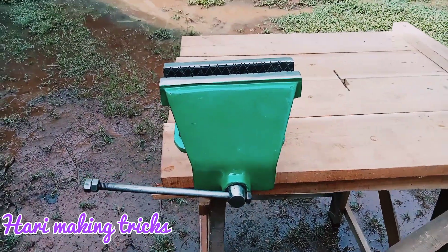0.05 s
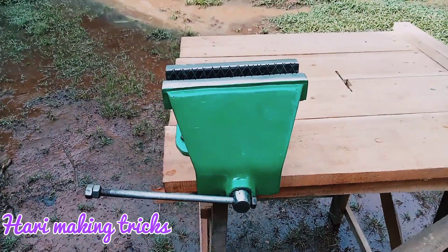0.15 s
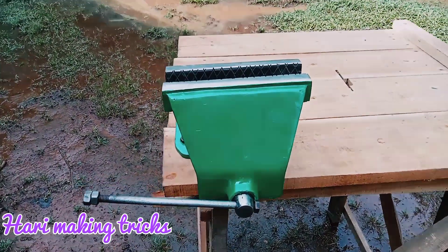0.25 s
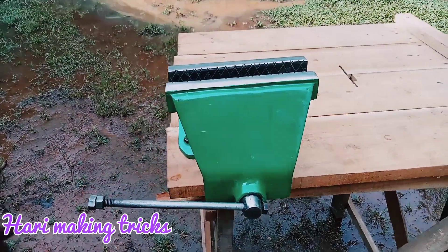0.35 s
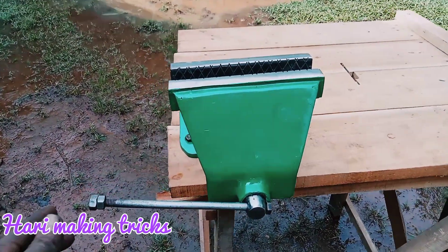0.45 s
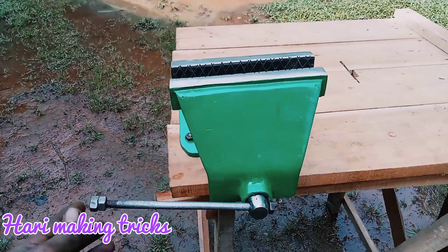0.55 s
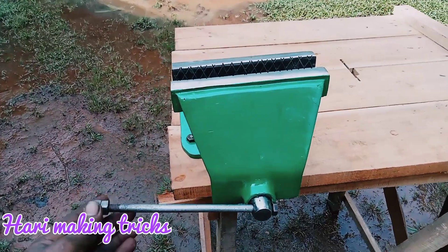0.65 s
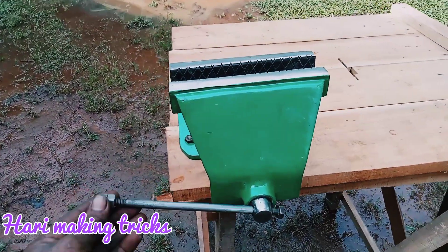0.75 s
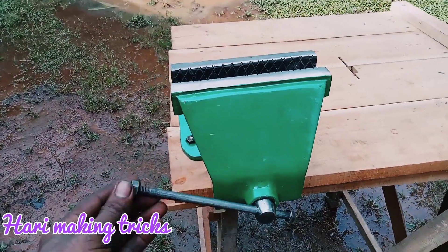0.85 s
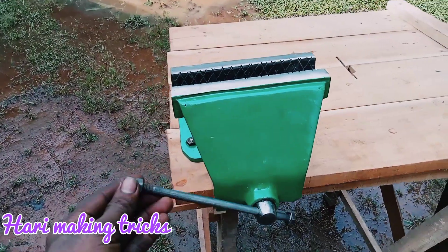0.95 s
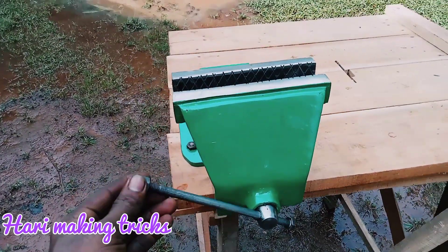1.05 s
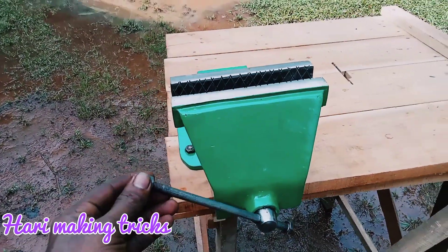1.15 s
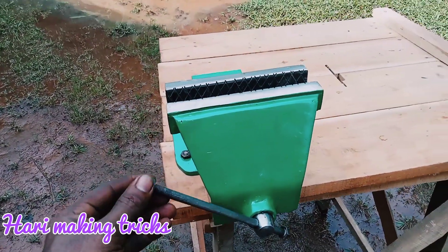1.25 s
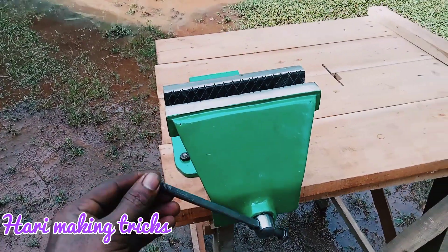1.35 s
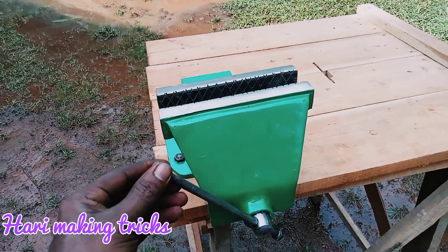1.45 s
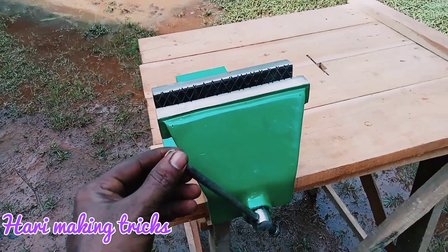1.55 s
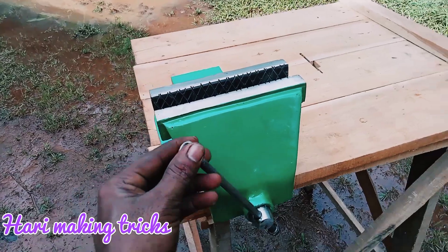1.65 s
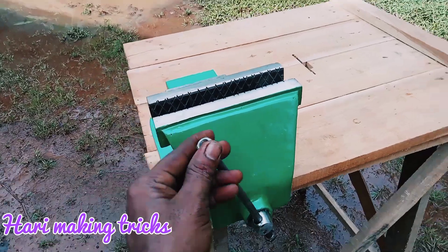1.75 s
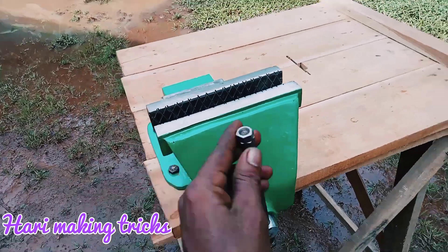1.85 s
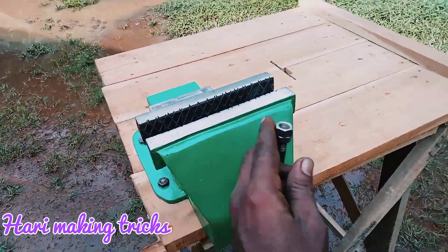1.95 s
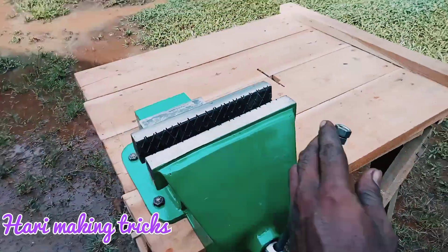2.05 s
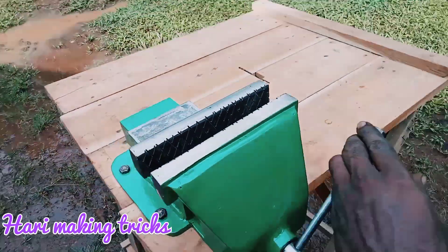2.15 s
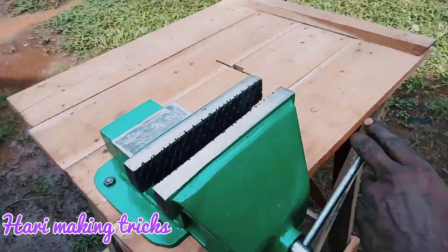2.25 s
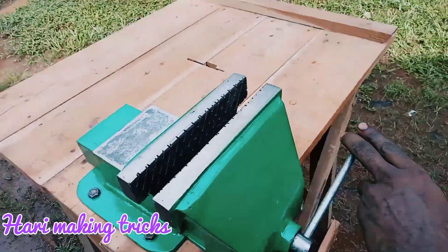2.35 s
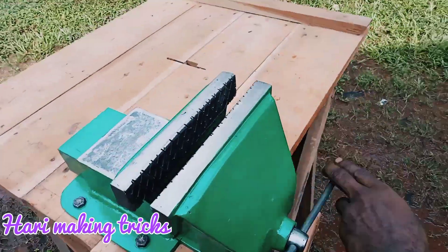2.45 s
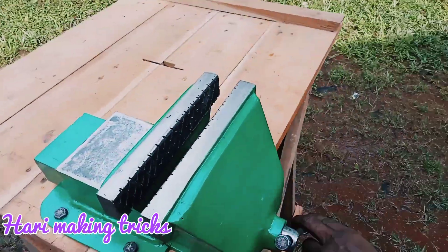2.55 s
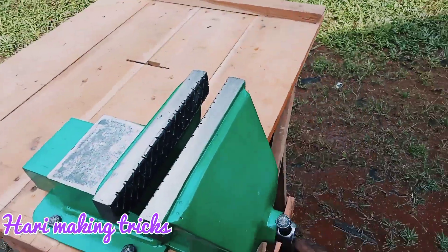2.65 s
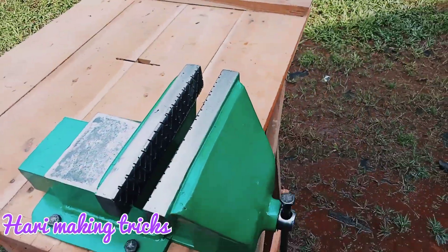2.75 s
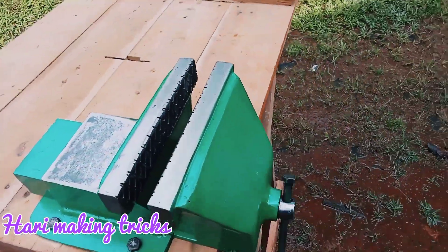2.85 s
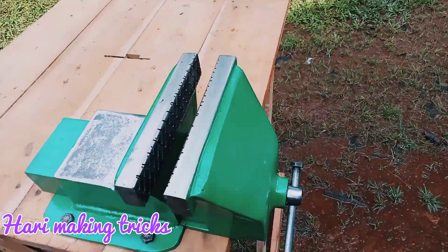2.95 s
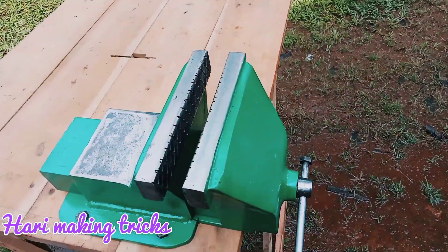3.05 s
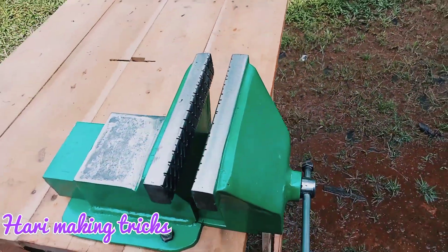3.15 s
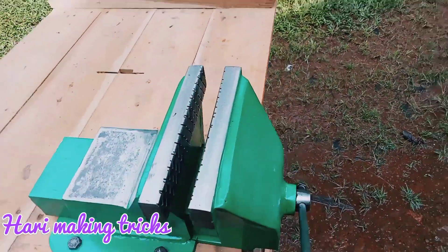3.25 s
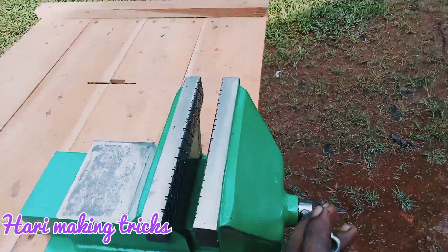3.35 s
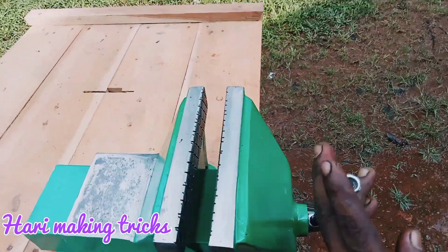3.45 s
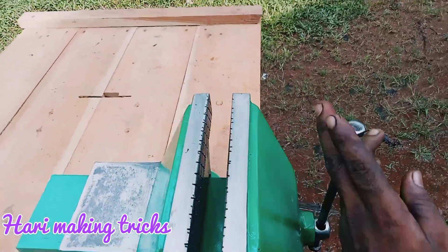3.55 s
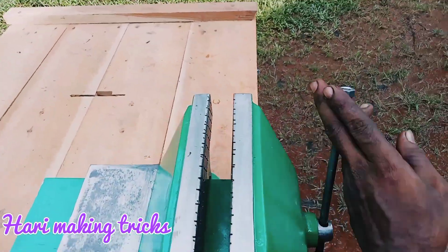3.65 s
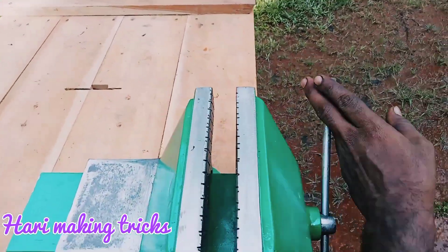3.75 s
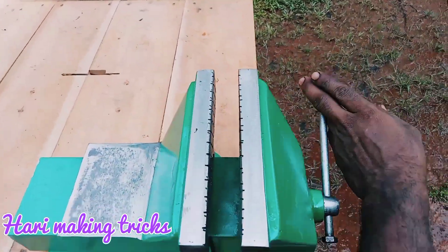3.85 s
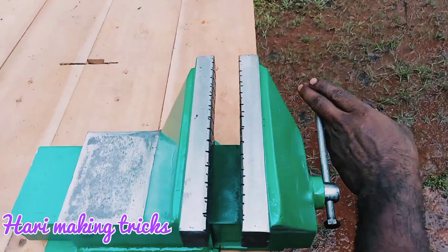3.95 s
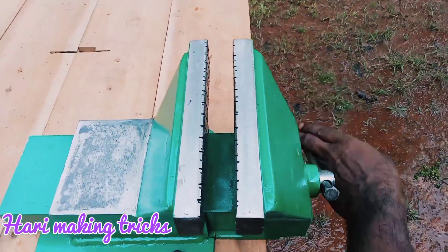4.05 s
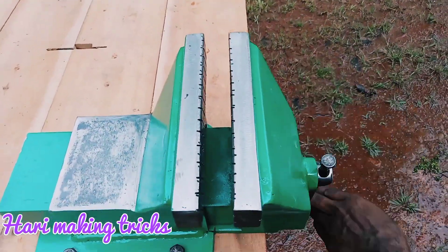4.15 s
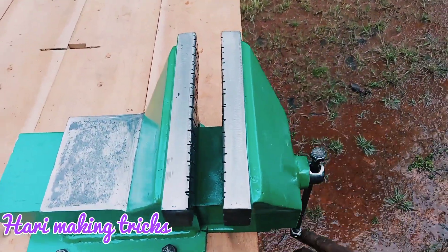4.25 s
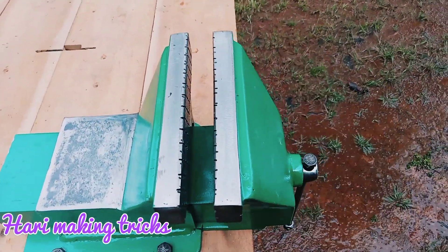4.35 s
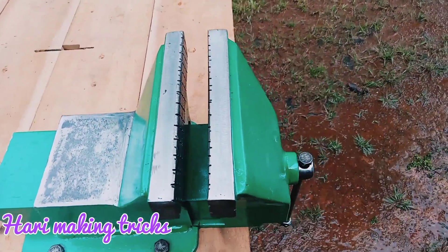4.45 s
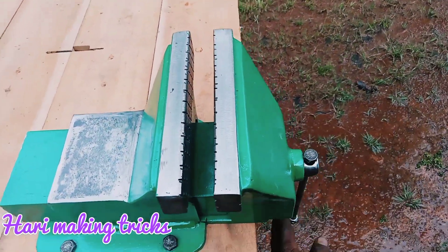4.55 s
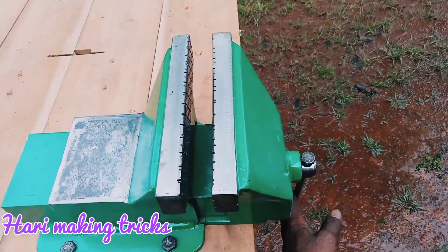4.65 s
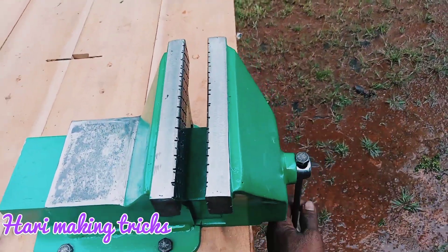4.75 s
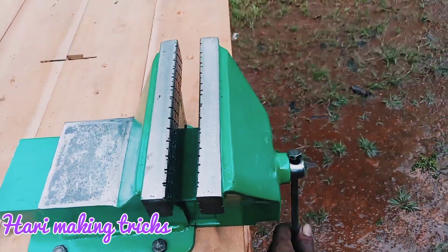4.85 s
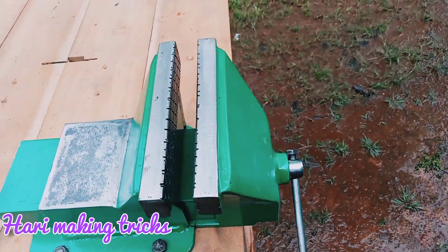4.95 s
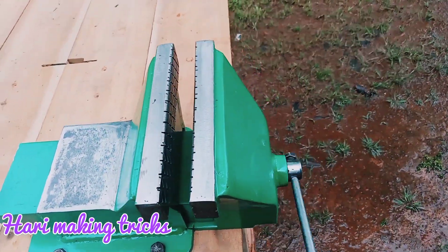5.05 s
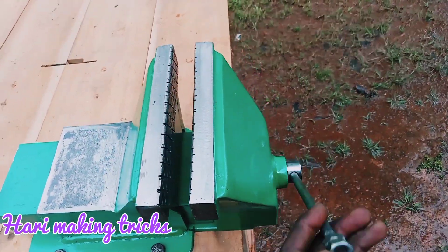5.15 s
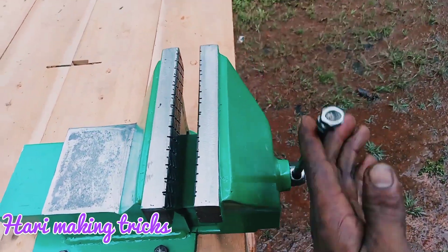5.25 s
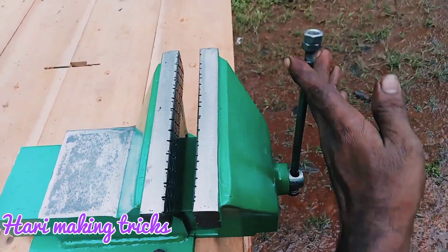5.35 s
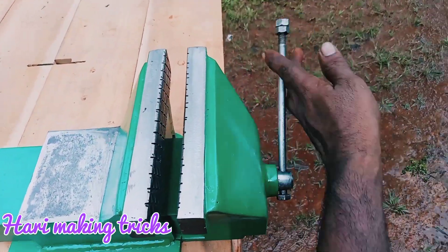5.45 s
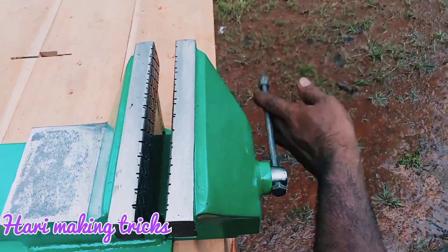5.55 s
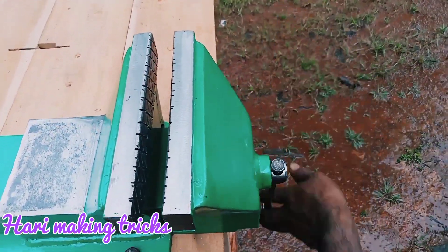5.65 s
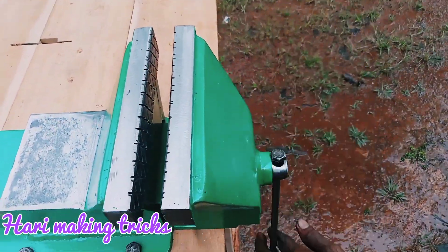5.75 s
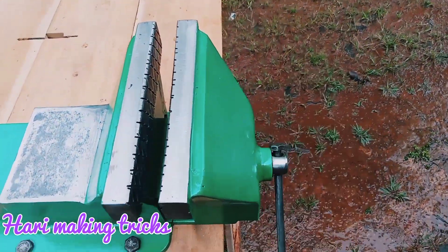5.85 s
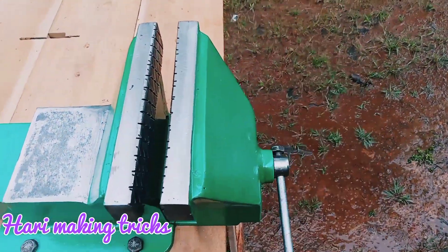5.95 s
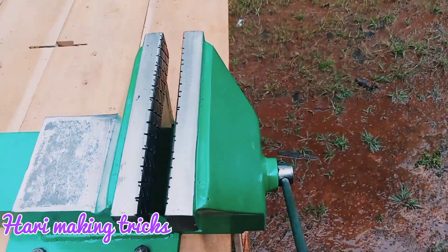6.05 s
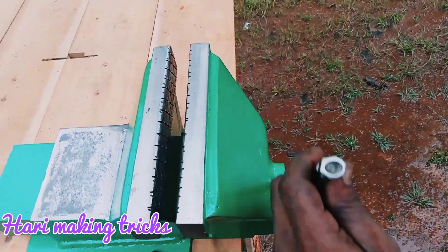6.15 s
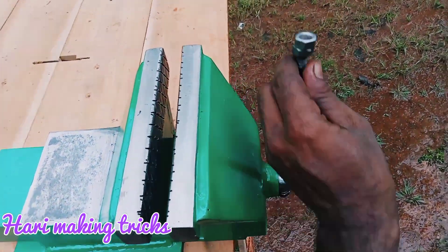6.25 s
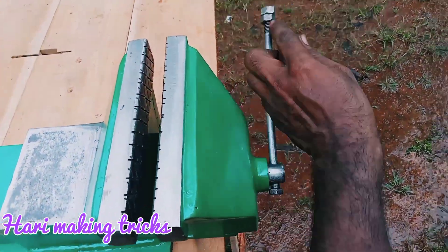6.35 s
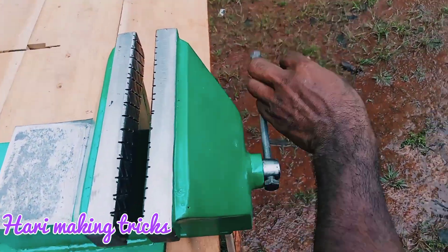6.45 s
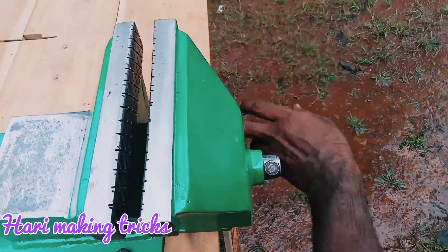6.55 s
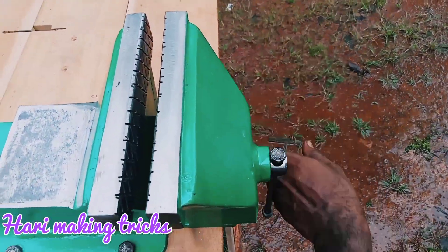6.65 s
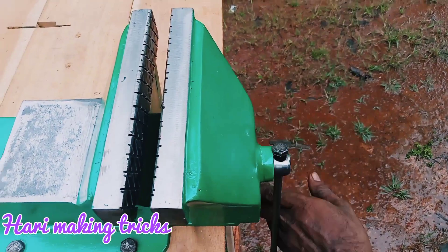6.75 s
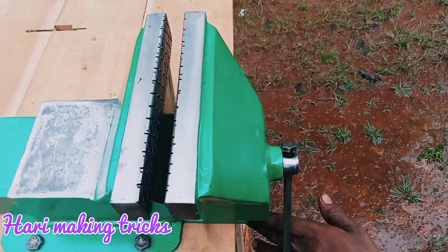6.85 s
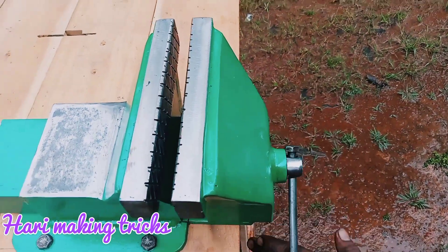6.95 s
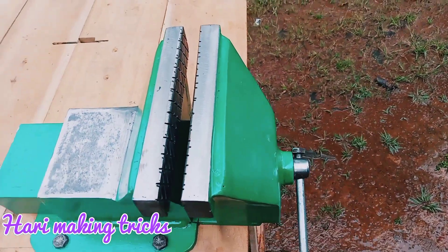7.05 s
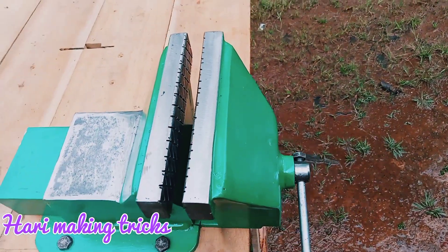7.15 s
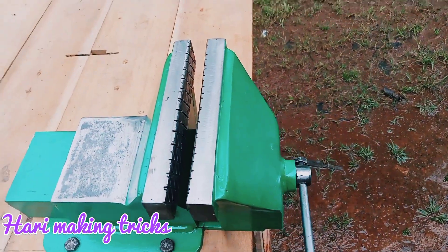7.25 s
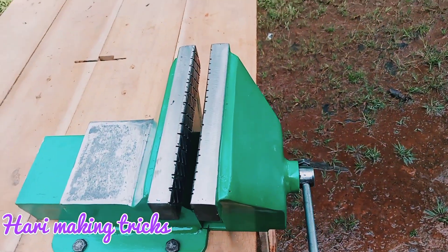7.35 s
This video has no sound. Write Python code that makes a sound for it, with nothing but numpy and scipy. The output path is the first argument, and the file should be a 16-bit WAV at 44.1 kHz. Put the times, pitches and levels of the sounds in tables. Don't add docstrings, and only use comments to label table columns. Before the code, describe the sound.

Close handheld phone capture in an open garden: a metal vise is wound open and shut. Dry screw grinding and small clicks build to two loud steel clacks, followed by irregular clunks and rattles with woody thuds from the bench. Quiet insect hiss, a thin high cricket and hoarse paired bird chirps remain behind. The treble is muffled for the first second; there is little reverberation.

```python
import sys
import numpy as np
from scipy import signal
from scipy.fft import rfft, irfft, next_fast_len
from scipy.io import wavfile
from scipy.ndimage import uniform_filter1d

SR = 44100
rng = np.random.default_rng(int(sys.argv[2]) if len(sys.argv) > 2 else 0)


def bounce(signal):
    frames = np.transpose(np.atleast_2d(signal))
    limited = np.clip(frames, -1, 1)
    pcm = np.round(limited * 32767).astype(np.int16)
    wavfile.write(sys.argv[1], SR, pcm)


def field_ratio(decibels):
    return 10 ** (np.asarray(decibels, dtype=float) / 20)


N = 325899
T = np.arange(N) / SR


def unit(x):
    return x / np.sqrt(np.mean(x ** 2))


def peak(x):
    return x / np.max(np.abs(x))


def colour(x, table):
    hz, db = np.transpose(table)
    size = next_fast_len(len(x))
    f = np.maximum(np.arange(size // 2 + 1) * SR / size, 1)
    gain = field_ratio(np.interp(np.log(f), np.log(hz), db))
    return irfft(rfft(x, size) * gain, size)[:len(x)]


def band(x, lo_hz, hi_hz):
    sos = signal.butter(3, [lo_hz, min(hi_hz, SR / 2.2)], "bandpass", fs=SR, output="sos")
    return signal.sosfilt(sos, x)


def walk(rate):
    k = int(SR / rate)
    held = np.repeat(rng.standard_normal(N // k + 1), k)
    return 1.24 * uniform_filter1d(uniform_filter1d(held, k), k)[:N]


def curves(table):
    s, *columns = np.transpose(table)
    return [np.interp(T, s, c) for c in columns]


def rings(modes, longest_s=.3):
    hz, db, t60 = np.transpose(modes)[:, :, None]
    t = T[:SR // 4]
    decay = np.exp(-np.log(1000) * t / np.clip(t60, .005, longest_s))
    return field_ratio(db) * np.sin(2 * np.pi * hz * t) * decay


def add(out, x, s, db):
    i = int(s * SR)
    x = x[:N - i]
    out[i:i + len(x)] += peak(x) * field_ratio(db)


# (time [s], length [s], thread level [dB], bench sway level [dB], planks level [dB])
PUSHES = [(0., 0.087, -49.5, -77, -78), (0.582, 0.18, -52.5, -74, -75), (0.925, 0.069, -44.5, -73, -78),
          (1.638, 0.75, -55.5, -82, -64), (2.065, 0.17, -51.5, -51.5, -57), (2.5, 0.24, -50, -57, -50),
          (2.76, 0.048, -45.5, -46, -60), (2.905, 0.043, -46, -40, -62), (3.067, 0.15, -44.5, -46.5, -48.5),
          (3.306, 0.21, -43, -51.5, -57), (3.502, 0.59, -47, -47, -50), (3.92, 0.33, -44.5, -45, -53),
          (4.104, 0.19, -39, -42, -45.5), (4.425, 0.13, -36, -40, -40.5), (4.864, 0.17, -41, -44, -41.5),
          (5.015, 0.27, -39, -44.5, -40), (5.36, 0.53, -44, -44.5, -44), (5.681, 0.071, -34, -32, -43),
          (5.816, 0.13, -63, -57, -46), (5.961, 0.11, -34.5, -53, -47), (6.118, 0.6, -43.5, -49, -44.5),
          (6.426, 0.25, -39.5, -60, -55), (7.167, 0.1, -50, -48, -51.5)]
# (time [s], level [dB])
REST = [
    (.3, -58),
    (1.4, -58),
    (3.2, -48),
    (4.7, -53.5),
    (6.9, -49),
]
PUSH_ATTACK_S, PUSH_RELEASE_S = 0.12, 0.15
REST_SWAY_DB, REST_PLANKS_DB = -13, -12.5


def pushes():
    power = field_ratio(curves(REST)[0] + np.array([[0], [REST_SWAY_DB], [REST_PLANKS_DB]])) ** 2
    for s, length_s, *db in PUSHES:
        attack = (T - s) / PUSH_ATTACK_S
        release = (s + length_s - T) / PUSH_RELEASE_S
        shape = np.clip(np.minimum(attack, release) + .5, 0, 1)
        power = power + (field_ratio(np.array(db))[:, None] * shape) ** 2
    return np.sqrt(power)


def singing(x, modes):
    patchy_db = 4
    out = 0
    for hz, db, t60 in modes:
        radius = np.exp(-np.log(1000) / (t60 * SR))
        angle = 2 * np.pi * hz / SR
        poles = [1, -2 * radius * np.cos(angle), radius * radius]
        level = field_ratio(db + patchy_db * walk(rate=14))
        out = out + level * signal.lfilter([np.sin(angle)], poles, x)
    return unit(out)


# (frequency [Hz], level [dB], t60 [s])
SWAY = [(105, -16.5, 0.13), (140, 0.5, 0.22)]
# (frequency [Hz], level [dB], t60 [s])
PLANKS = [(307.3, -1.5, 0.19), (313, -11.5, 0.15), (367.6, 1.5, 0.095), (473, -8, 0.073), (504, -17, 0.075)]
# (frequency [Hz], level [dB], t60 [s])
SLIDE = [(582, 6, 0.0098), (829.5, -7.5, 0.13), (892, -4, 0.088), (981, -5, 0.07), (1048, -8, 0.12),
         (1104, -3.5, 0.048), (1213, -3, 0.049), (1330, 1.5, 0.025)]
# (frequency [Hz], level [dB], t60 [s])
STEEL = [(1530, -12, 0.12), (1586, 5, 0.096), (1800, -1, 0.14), (1940, 0.5, 0.23), (2209, 6.5, 0.088),
         (2276, 8.5, 0.034), (2362, 5.5, 0.08), (2597, 8.5, 0.066), (2786, 7, 0.036), (3120, 6.5, 0.022),
         (3404, 7, 0.046), (3676, 2.5, 0.031), (3850, -11, 0.05), (4300, -23, 0.045)]
# (frequency [Hz], level [dB])
SCRAPE = [(290, -24), (500, -6), (609, -12), (807, -6.5), (1010, -11.5), (2350, -6.5), (3720, -15),
          (4980, -41), (6000, -24.5), (7800, -77), (13200, -120)]


def grind():
    thread, rocking, load = pushes()
    slips = []
    for _ in range(5):
        noise = rng.standard_normal(N)
        uneven_db = np.minimum(3.5 * walk(rate=300) + 2.8 * walk(rate=45), 9)
        slips.append(noise * field_ratio(uneven_db))
    sway = unit(signal.fftconvolve(slips[0], rings(SWAY).sum(axis=0))[:N])
    planks = unit(signal.fftconvolve(slips[1], rings(PLANKS).sum(axis=0))[:N])
    sing = field_ratio(-4.5) * singing(slips[2], SLIDE) + field_ratio(-6) * singing(slips[3], STEEL)
    scrape = field_ratio(-3) * unit(colour(slips[4], SCRAPE))
    return rocking * sway + load * planks + thread * (sing + scrape)


# (time [s], peak level [dB], jaws re steel [dB], chatter [s])
TAPS = [(1.451, -28, -13, 0.0043), (1.464, -33, -7, 0.017), (1.64, -28, -6, 0.012),
        (1.826, -31, -13, 0.0074), (2.074, -33.5, -6, 0.0024), (2.34, -30, -33, 0.018),
        (2.385, -32, -11, 0.0034), (3.02, -31, -8, 0.033), (6.696, -28, -12, 0.0015),
        (7.27, -35, -6, 0.003)]
# (time [s], peak level [dB], slide re steel [dB], jaws re steel [dB], chatter [s])
CLACKS = [(.597, -33.5, -9, -37, 0.012), (0.71, -36.5, -23, -40, 0.031), (0.956, -36, 7, -3.5, 0.0074),
          (1.436, -35, -3, -10, 0.007), (1.506, -36.5, -2, -5, 0.0034), (2.306, -32.5, -6, -22, 0.016),
          (2.597, -44, 7.5, 5.5, 0.019), (2.766, -30.5, -1.5, -4, 0.011), (3.093, -28.5, -5.5, -14, 0.006),
          (3.309, -30, 1, -12, 0.0023), (3.318, -22.5, -2.5, -17, 0.0012), (3.328, -31, -8, -3, .026),
          (3.435, -32, -9, -9, 0.014), (3.898, -27.5, 2.5, -11.5, 0.021), (4.226, -31.5, 5, -9, 0.0063),
          (4.444, -16.5, -16, -18, 0.012), (4.476, -16, 2.5, -2, 0.0081), (4.862, -15.5, -3.5, -50, 0.017),
          (6.455, -26.5, 4.5, -13, 0.017), (6.61, -30, -16, -12, 0.021), (6.9, -39, -2, -2, 0.0033)]
# (time [s], peak level [dB], planks re steel [dB], chatter [s])
OPENING = [(0.123, -35, 4, 0.00097), (0.641, -39, -23, 0.0039), (1.959, -38, 0.5, 0.0044),
           (2.559, -37.5, 2.5, 0.012), (2.846, -33, -9, 0.048), (2.921, -38, 5, 0.017),
           (3.515, -38, 0, 0.014), (3.911, -31.5, 11, 0.0043), (3.937, -30, -21, 0.022),
           (4.068, -31, -15, 0.027), (4.114, -35, 3.5, 0.0013), (4.211, -29, -30, 0.0036)]
# (time [s], peak level [dB], planks re steel [dB], chatter [s])
CLOSING = [(4.993, -26, -27, 0.0046), (5.045, -29.5, -13, 0.052), (5.083, -21, -15, 0.0015),
           (5.159, -32, -7, 0.015), (5.354, -31, -9, 0.0082), (5.438, -32.5, -23, 0.0051),
           (5.53, -32, 3.5, 0.028), (5.579, -27.5, 9.5, 0.0069), (5.635, -27, -19, 0.002),
           (5.744, -24.5, -6, 0.006), (5.834, -35, -5, 0.0096), (5.94, -22.5, -1.5, 0.0089),
           (6.022, -20, 1, 0.014), (6.075, -29, 1.5, 0.024), (6.177, -19, -10.5, 0.0072),
           (6.256, -23.5, -40, 0.0084), (6.319, -36, -19, 0.0084), (6.488, -25, -10, 0.0019),
           (6.542, -27.5, -2, 0.012), (7.098, -31, 2, 0.0064), (7.121, -39.5, 4, 0.0097)]
TAP_PLANKS_DB, TAP_SLIDE_DB = -45, -34.5
OPENING_SLIDE_DB, OPENING_JAWS_DB = -4.5, -28
CLOSING_SLIDE_DB, CLOSING_JAWS_DB = 2, -38
PLANKS_UNDER_SLIDE_DB = -8.5


def blows():
    taps = [(s, db, TAP_PLANKS_DB, TAP_SLIDE_DB, jaws, c) for s, db, jaws, c in TAPS]
    clacks = [(s, db, slide + PLANKS_UNDER_SLIDE_DB, slide, jaws, c) for s, db, slide, jaws, c in CLACKS]
    opening = [(s, db, planks, OPENING_SLIDE_DB, OPENING_JAWS_DB, c) for s, db, planks, c in OPENING]
    closing = [(s, db, planks, CLOSING_SLIDE_DB, CLOSING_JAWS_DB, c) for s, db, planks, c in CLOSING]
    return taps + clacks + opening + closing


# (frequency [Hz], level [dB], t60 [s])
JAWS = [(4870, -10, 0.1), (5000, -9, 0.08), (5470, 0.5, 0.076), (5770, 4, 0.066), (6460, -5, 0.1),
        (7294, 12, 0.095), (7470, -8, 0.061), (7605, -16, 0.071), (7700, -5, .3), (8500, -6, 0.11),
        (9600, -27, 0.08)]
HARD_AT_SLIDE_DB, SOFT_AT_SLIDE_DB = -35, -0.5
RING_GROWS = .35


def knocks():
    out, t = np.zeros(N), T[:SR // 8]
    # modes, lowest Hz, highest Hz, crack dB
    parts = [(rings(STEEL), 1500, 4600, 4), (rings(SWAY + PLANKS), 160, 550, -8),
             (rings(SLIDE), 680, 1600, -3), (rings(JAWS, longest_s=0.19), 4900, 10000, 5)]
    for s, db, planks_db, slide_db, jaws_db, chatter_s in blows():
        hard = np.clip(slide_db / HARD_AT_SLIDE_DB, 0, 1)
        soft = np.clip(slide_db / SOFT_AT_SLIDE_DB, 0, .85)
        u = t / np.clip(chatter_s, .0005, .04)
        contacts = (1 - np.exp(-u / (0.41 + 0.86 * soft))) * np.exp(-u) * rng.standard_normal(len(t))
        bounces_db = uniform_filter1d(20 * rng.standard_normal(len(t)), size=SR // 1000)
        contacts = signal.lfilter([1, -hard], [1, -soft], contacts * field_ratio(bounces_db))
        for (bank, lo_hz, hi_hz, crack_db), rel_db in zip(parts, (0, planks_db, slide_db, jaws_db)):
            struck = field_ratio(2.5 * rng.standard_normal(len(bank))) @ bank
            fade_s = 4 / lo_hz ** .55 * field_ratio(.4 * db - 14 * hard ** 2)
            struck *= np.exp(-T[:len(struck)] / fade_s)
            ring = band(signal.fftconvolve(struck, contacts), lo_hz, hi_hz)
            crack = band(np.pad(contacts, (0, len(ring) - len(t))), lo_hz, hi_hz)
            crack_gain = field_ratio(crack_db - RING_GROWS * (db + 42.0))
            add(out, peak(ring) + crack_gain * peak(crack), s - .0015, db + rel_db)
    return out


def chatter(chatter_s):
    u = T[:SR // 30] / np.clip(chatter_s, .0005, .008)
    return (1 - np.exp(-u / .5)) * np.exp(-u) * rng.standard_normal(len(u))


# (frequency [Hz], level [dB], t60 [s])
NECK = [(1330, -8, .09), (1631, -1, .07), (1900, -6, .05), (2143, -10, .069), (2256, -2, .033),
        (2358, -6, .084), (2659, -2, .09), (3100, -14, .04), (3693, -14, .05), (4920, -24, .08),
        (5652, -13, .062), (7068, -20, .03), (7750, -15, .02)]
NUT = [(748, -11, .12), (1100, -8, .06), (1879, -6, .08), (2363, -2, .065), (2842, -8, .05),
       (3682, -2, .036), (5340, -21, .07), (5652, -14, .06), (6094, -16, .06), (6438, -16, .09),
       (6977, -10, .05), (7612, -10, .04), (8064, -28, .2), (8753, -21, .04)]
SHOULDER = [(824, -12, .07), (974, -4, .06), (1098, 2, .06), (1340, -8, .06), (1556, -9, .04),
            (1830, -7, .035), (2240, -4, .03), (2363, -1, .045), (2713, -7, .049), (3198, -13, .035),
            (3682, -6, .055), (4242, -12, .04), (5346, -31, .08), (5642, -26, .08), (6648, -29, .07)]
TIP = [(1082, -20, .03), (1976, -1, .025), (2620, 0, .028), (3289, -1, .025), (3828, -6, .025),
       (4600, -17, .02), (6481, -14, .02), (7698, -10, .02), (8721, -20, .02)]
# (time [s], peak level [dB], chatter [s], crack re ring [dB])
NECK_STRIKES = [
    (4.3705, -14, 0.003, 4),
    (4.377, -16.5, 0.0025, -5),
]
NUT_STRIKES = [
    (4.4703, -7.5, 0.0028, 2),
    (4.4755, -3, 0.0018, 1.4),
    (4.483, -16, 0.004, 0),
]
SHOULDER_STRIKES = [
    (4.8778, -7.5, 0.0025, 1.6),
    (4.884, -11.5, 0.0024, 2.5),
]
TIP_STRIKES = [
    (1.665, -21.5, 0.0017, 9),
    (1.674, -34, 0.0013, 6),
    (1.817, -21, 0.0015, 5.6),
    (1.8402, -17.5, 0.0014, 8.7),
    (2.1519, -15, 0.0011, 7),
    (2.159, -31, 0.009, 3.6),
    (3.0905, -20, 0.0015, 8.3),
    (3.101, -29.5, 0.0018, 6),
    (3.305, -27, 0.0022, 6),
]
BLUNT_ABOVE_HZ = [8300, 10500, 5600, 9500]
SMEAR_DB, SMEAR_S = -31, .013


def strikes():
    out = np.zeros(N)
    struck_parts = (NECK, NUT, SHOULDER, TIP)
    landings = (NECK_STRIKES, NUT_STRIKES, SHOULDER_STRIKES, TIP_STRIKES)
    for modes, rows, top_hz in zip(struck_parts, landings, BLUNT_ABOVE_HZ):
        hz, mode_db, _ = np.transpose(modes)
        crack_colour = np.transpose([[*hz, 1.3 * hz[-1]], [*(1.2 * mode_db), -55]])
        for s, db, chatter_s, crack_db in rows:
            contacts = band(band(chatter(chatter_s), 150, top_hz), 150, top_hz)
            rung = signal.fftconvolve(rings(modes, longest_s=0.17), contacts[None], axes=1)
            ring = (field_ratio(mode_db) / np.max(np.abs(rung), axis=1)) @ rung
            crack = colour(np.pad(contacts, (0, len(ring) - len(contacts))), crack_colour)
            crack = band(crack, .7 * hz[0], 1.1 * hz[-1])
            crack = crack * (T[:len(crack)] < .1)
            tail_n = len(contacts) * 2
            tail = rng.standard_normal(tail_n) * np.exp(-T[:tail_n] / SMEAR_S)
            crack = crack + field_ratio(SMEAR_DB) * signal.fftconvolve(crack, tail)[:len(crack)]
            add(out, peak(ring) + field_ratio(crack_db) * peak(crack), s, db)
    return out


# (time [s], peak level [dB], frequency [Hz])
SPOTS = [(0.12, -26, 887), (0.954, -35, 936), (1.958, -20.5, 1480), (1.992, -29.5, 1710), (2.11, -30, 2180),
         (2.599, -26.5, 1130), (2.765, -25.5, 603), (2.846, -26, 1800), (2.921, -26, 1080),
         (3.09, -24, 900), (3.154, -29, 880), (3.199, -28, 860), (3.268, -25, 1800), (3.309, -23, 760),
         (3.317, -27.5, 653), (3.339, -29, 850), (3.449, -32, 2060), (3.91, -28, 814), (3.936, -21, 556),
         (4.068, -23, 1300), (4.118, -25.5, 1230), (4.211, -19.5, 1700), (4.861, -16, 2280),
         (4.993, -19.5, 870), (5.042, -29, 1090), (5.085, -14, 830), (5.09, -12.5, 427), (5.12, -20, 610),
         (5.194, -18, 560), (5.353, -28, 530), (5.437, -32, 860), (5.528, -26, 820), (5.58, -16.5, 840),
         (5.635, -24, 760), (5.699, -19.5, 840), (5.75, -18, 1560), (5.834, -21.5, 1380),
         (5.94, -15.5, 1056), (5.94, -17, 1310), (6.027, -13.5, 1020), (6.012, -28, 2520),
         (6.036, -13.5, 2420), (6.072, -16.5, 850), (6.089, -29, 810), (6.178, -22, 1073),
         (6.261, -18, 1120), (6.32, -26, 825), (6.456, -24, 870), (6.487, -21.5, 490), (6.543, -28, 1090),
         (6.476, -16, 870), (6.595, -24, 2450), (6.609, -27, 1070), (6.645, -26, 1480), (6.655, -32, 770),
         (6.695, -29, 1470), (7.097, -29, 1330)]
SPOT_UNDER_DB, SPOT_CYCLES, SPOT_CHATTER_S = -7, 36, .0022


def spots():
    out = np.zeros(N)
    for s, db, hz in SPOTS:
        t60 = SPOT_CYCLES / hz
        note = rings([(hz, 0, t60), (0.812 * hz, -6, t60)]).sum(axis=0)
        add(out, signal.fftconvolve(note, chatter(SPOT_CHATTER_S)), s - .001, db + SPOT_UNDER_DB)
    return out


# (time [s], peak level [dB], centre frequency [Hz])
TICKS = [(1.4645, -29, 7000), (1.4742, -31, 6660), (1.6754, -39, 6660), (1.719, -33, 7060),
         (2.0906, -43, 7150), (2.17, -42, 6400), (2.184, -38, 6400), (2.2368, -40, 6900),
         (4.862, -42, 6900), (5.118, -29, 6700)]
# (time [s], peak level [dB], centre frequency [Hz], fade [s], spread [ratio])
PINGS = [
    (1.754, -32, 9500, .0008, 1.5),
    (3.295, -27, 11300, 0.0016, 1.07),
    (4.4707, -1, 13400, .003, 1),
]
TICK_FADE_S, TICK_SPREAD = 0.002, 1.14


def ticks():
    out, t = np.zeros(N), T[:SR // 40]
    for s, db, hz, fade_s, spread in [(*tick, TICK_FADE_S, TICK_SPREAD) for tick in TICKS] + PINGS:
        burst = rng.standard_normal(len(t)) * np.exp(-t / fade_s)
        ratio = max(spread, 1.02)
        add(out, band(burst, hz / ratio, hz * ratio) + 0.17 * band(burst, 2700, 9100), s, db)
    return out


# (time [s], level [dB])
SQUEAL = [
    (.84, -64),
    (.875, -42.5),
    (.89, -34.5),
    (.905, -44),
    (.93, -43),
    (.96, -45),
    (.99, -65),
]
# (frequency [Hz], level [dB], t60 [s])
COLLAR = [(1950, -6, .02), (2540, 0, .025), (3000, -2, .025), (780, -11, .025), (1300, -12, .01),
          (4420, -23, .08)]


def squeal():
    db, = curves(SQUEAL)
    inside = (T > SQUEAL[0][0]) & (T < SQUEAL[-1][0])
    rubbing = signal.fftconvolve(rng.standard_normal(N), rings(COLLAR).sum(axis=0))[:N]
    return inside * field_ratio(db) * unit(band(rubbing, 790, 3500))


# (time [s], peak level [dB], centre frequency [Hz])
JOLTS = [(0.024, -50.5, 111), (0.637, -41.5, 400), (0.97, -40, 140), (2.131, -40, 140), (2.906, -33, 306),
         (3.129, -34.5, 136), (3.516, -33, 140), (3.768, -37, 152), (4.478, -16, 310), (5.094, -23, 414),
         (5.711, -17.5, 325), (5.721, -23, 320), (5.134, -26, 330), (5.16, -22.5, 300), (6.018, -22.5, 346),
         (6.258, -15.5, 316), (6.49, -24.5, 370), (7.238, -28, 136)]


def jolts():
    out, bank = np.zeros(N), rings(SWAY + PLANKS)
    modes_hz = np.transpose(SWAY + PLANKS)[0]
    push = rng.standard_normal((len(JOLTS), SR // 50)) * np.hanning(SR // 50)
    for (s, db, hz), p in zip(JOLTS, push):
        nearest = field_ratio(-18 * np.abs(np.log2(modes_hz / hz))) @ bank
        add(out, signal.fftconvolve(nearest, band(p, 0.75 * hz, 2.84 * hz)), s - .006, db)
    return out


# (time [s], first level [dB], second level [dB])
LONG_PAIRS = [(-.05, -74, -50.5), (.563, -50, -45.5), (.824, -53, -66), (1.905, -48, -61),
              (3.105, -42, -42.5), (3.787, -43, -40), (4.715, -54, -45), (4.822, -42, -70),
              (5.07, -42, -68), (5.232, -41.5, -39), (6.147, -43, -40.5), (7.295, -42, -41)]
# (time [s], first level [dB], second level [dB])
CLIPPED_PAIRS = [
    (2.218, -41.5, -70),
    (4.586, -42, -40),
    (6.283, -41, -42),
]
# (length [s], first frequency [Hz], last frequency [Hz], hoarseness [0-1])
LONG_CHIRP = (.048, 3660, 3240, .9)
CLIPPED_CHIRP = (.028, 3260, 2900, .35)
# (time [s], length [s], first frequency [Hz], last frequency [Hz], hoarseness [0-1], level [dB])
WHISTLE = (4.778, .07, 6130, 6290, .1, -52)
PAIR_GAP_S = .052


def chirps():
    calls = [WHISTLE]
    for pairs, chirp in ((LONG_PAIRS, LONG_CHIRP), (CLIPPED_PAIRS, CLIPPED_CHIRP)):
        for s, *dbs in pairs:
            for k, db in enumerate(dbs):
                start_s = s + k * PAIR_GAP_S
                if start_s >= 0:
                    calls.append((start_s, *chirp, db))
    return calls


def birds():
    out, flutter = np.zeros(N), walk(rate=330)
    for s, length_s, first_hz, last_hz, hoarse, db in chirps():
        hz = np.linspace(first_hz, last_hz, int(length_s * SR))
        unsteady = uniform_filter1d(rng.standard_normal(len(hz)), size=SR // 500)
        hz = hz * (1 + .4 * hoarse ** 2 * unsteady)
        voice = np.hanning(len(hz)) ** .6 * np.sin(2 * np.pi * np.cumsum(hz) / SR)
        add(out, voice * (1 + .8 * hoarse * np.resize(flutter[int(s * SR):], len(hz))), s, db)
    t = T[:SR // 5]
    scatter = rng.standard_normal(len(t)) * np.exp(-t / .04)
    return out + field_ratio(-32) * signal.fftconvolve(out, scatter)[:N]


# (time [s], hiss level [dB], cricket level [dB], near cricket's share [0-1])
GARDEN = [
    (1.1, -62.5, -75, .2),
    (1.55, -60.5, -74, .2),
    (2.22, -55.5, -71, .3),
    (2.45, -57.5, -60.5, .75),
    (3.22, -54.5, -64, 0.3),
    (4.01, -54.5, -69, 0.25),
    (4.9, -55.5, -68, 0.2),
    (6.25, -53.5, -65, 0.15),
    (6.81, -57, -68, 0.2),
    (7.39, -55.5, -63, .2),
]
# (frequency [Hz], level [dB per Hz])
HISS = [(18, -43), (30, -21), (336, -3), (740, -30), (866, -42), (988, -27), (1860, -4), (2290, -6.5),
        (3060, -8.5), (4780, -33.5), (7090, -7), (8520, -22.5), (11400, -33.5), (14800, -27), (16000, -36)]
# (time [s], frequency [Hz])
CRICKET_PITCH = [
    (2.5, 15450),
    (2.9, 14800),
    (3.3, 14400),
    (3.8, 14500),
    (4.4, 14900),
]
CRICKET_HZ, CRICKET_START_S, CRICKET_WIDTH_HZ = 20.65, .001, 950


def garden():
    hiss_db, cricket_db, near = curves(GARDEN)
    hiss = colour(rng.standard_normal(N) * field_ratio(1.0 * walk(rate=12)), HISS)
    hiss = hiss / np.sqrt(np.mean(band(hiss, 4300, 11000) ** 2))
    cicada = unit(band(rng.standard_normal(N), 9230, 9640)) * field_ratio(-18.0 + 1.5 * walk(rate=6.0))
    turn = 2 * np.pi * CRICKET_HZ * (T - CRICKET_START_S) + .25 * walk(rate=8)
    depth = np.clip(near, 0, .9)
    strokes = (1 + depth * np.cos(turn)) * (1 + .5 * depth * np.cos(4 * turn))
    strokes = strokes * field_ratio(1.2 * walk(rate=18))
    carrier = np.sin(2 * np.pi * np.cumsum(curves(CRICKET_PITCH)[0]) / SR)
    cricket = unit(band(rng.standard_normal(N), 5, CRICKET_WIDTH_HZ) * carrier * strokes)
    breeze_db = -65.5 + 0.67 * walk(rate=8.1) + 0.93 * T
    breeze = unit(band(rng.standard_normal(N), 42, 128)) * field_ratio(breeze_db)
    return field_ratio(hiss_db - 0.62) * (hiss + cicada) + field_ratio(cricket_db + 3.5) * cricket + breeze


# (frequency [Hz], level [dB])
PORT = [(4000, -2.5), (5000, -22.5), (6300, -4), (8500, 1.5), (11300, -14), (13500, -20)]


def scene():
    vise = colour(knocks() + ticks(), PORT) + strikes() + spots() + squeal() + jolts() + grind()
    return (vise + birds() + garden())[None]


# (frequency [Hz], level [dB])
EDGES = [(30, -13.5), (60, -6), (110, 0.5), (15500, -1.5), (15620, -50), (16600, -56), (16700, -85)]
# (frequency [Hz], level [dB])
MUFFLE = [(3600, -1), (4500, -2), (5500, -7), (6750, -25), (6900, -79)]
TREBLE_OPENS_S = .913


def microphone(x):
    x = colour(x, EDGES)
    return np.where(T < TREBLE_OPENS_S, colour(x, MUFFLE), x)


def top_cut(x):
    return signal.sosfilt(signal.butter(12, 16660, fs=SR, output="sos"), x)


def record(dry):
    mix = microphone(dry[0])[None]
    return top_cut(mix)


dry = scene()
out = record(dry)
bounce(out)
```